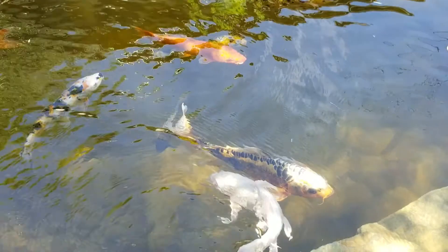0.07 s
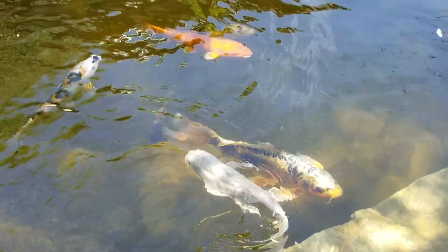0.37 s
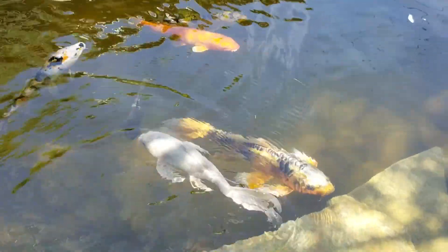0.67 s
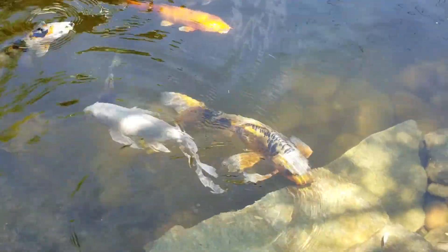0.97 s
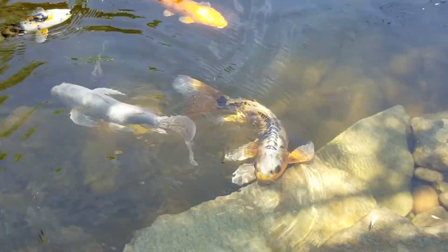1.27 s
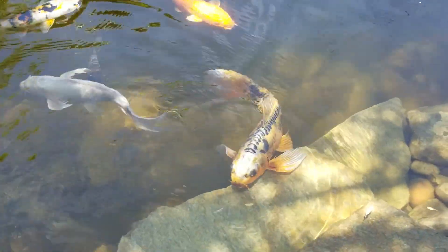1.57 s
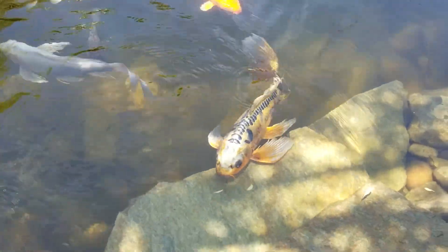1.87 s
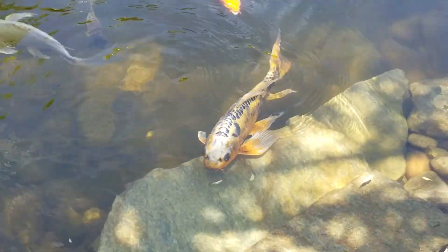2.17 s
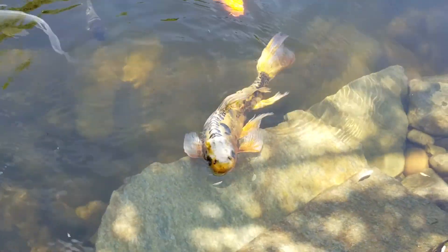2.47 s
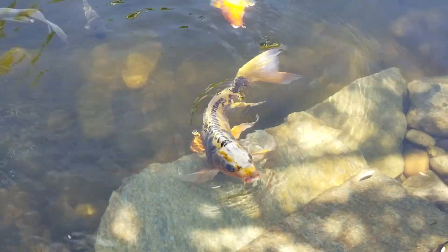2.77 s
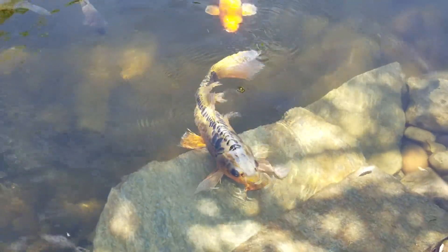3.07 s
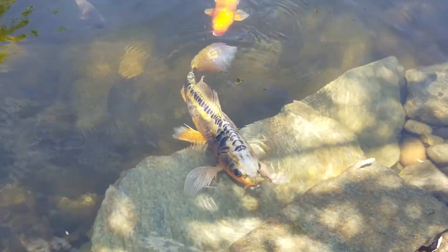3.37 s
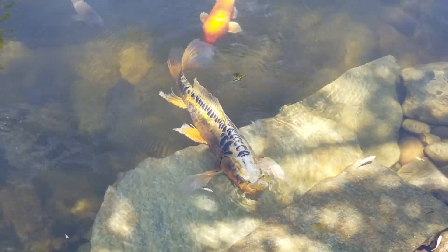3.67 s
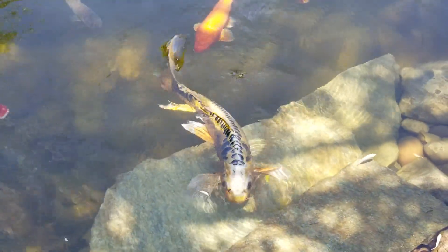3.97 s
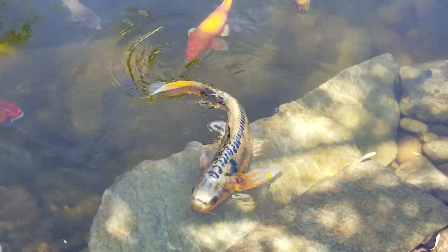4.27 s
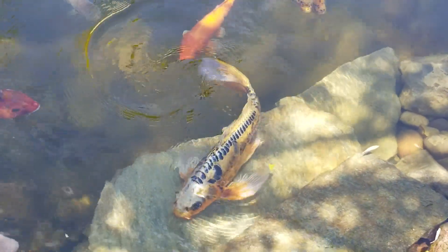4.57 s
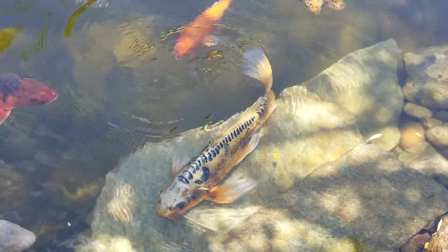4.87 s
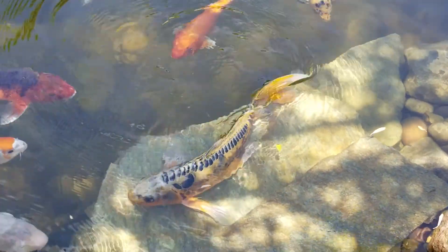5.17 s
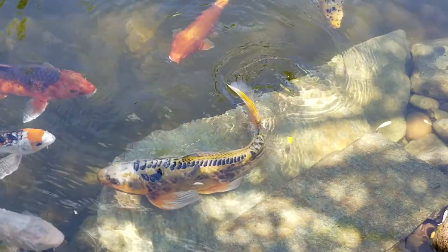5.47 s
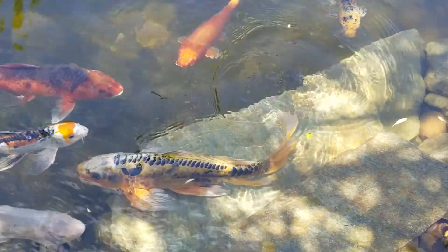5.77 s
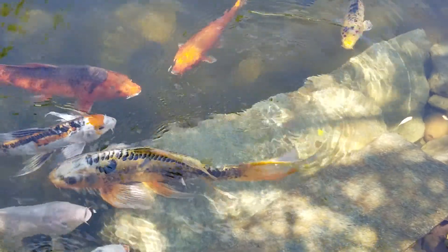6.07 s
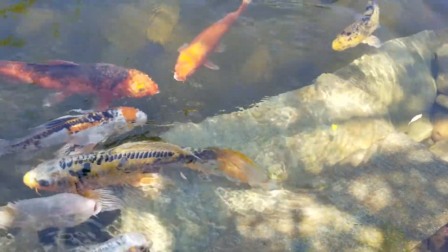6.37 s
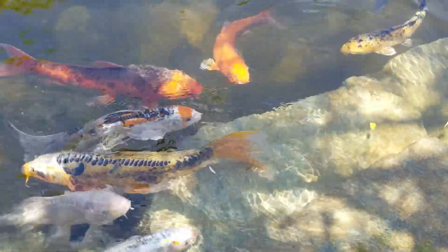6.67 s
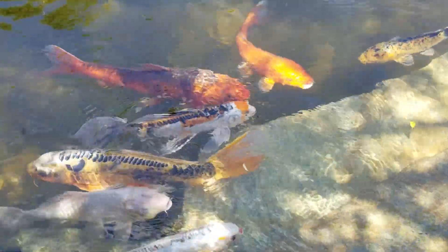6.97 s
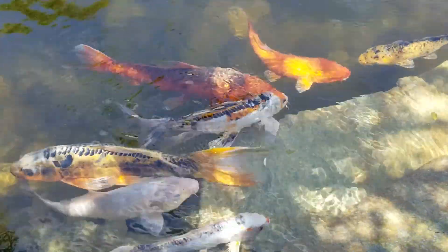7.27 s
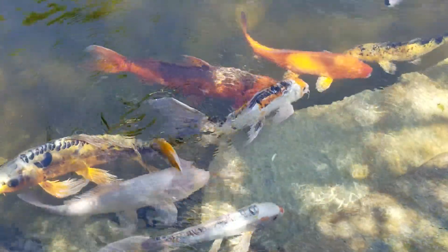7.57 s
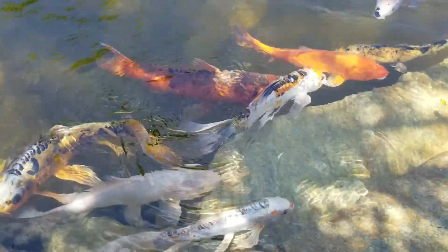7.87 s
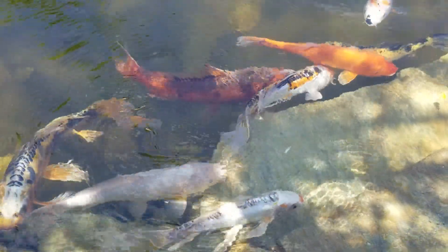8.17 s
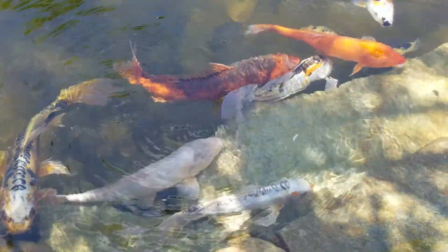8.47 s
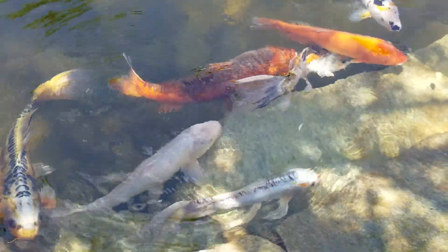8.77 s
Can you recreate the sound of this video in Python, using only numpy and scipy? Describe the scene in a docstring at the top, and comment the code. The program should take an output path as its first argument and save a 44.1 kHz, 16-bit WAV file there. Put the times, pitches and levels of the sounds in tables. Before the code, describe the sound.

A gentle pond trickle with ticking drops and small bubbles, a low motor hum behind it, and a few bumps of microphone handling.

```python
"""Water trickles into a garden pond, left of a hand-held camera: drops tick and trapped bubbles ring
over a soft wash, while a motor, probably the pump, drones low and light air rumbles.
At the start a finger rubs by the right microphone port (its opening) and knocks on the case;
it rubs again now and then. From about 5 s deeper bubbles join in, then a faint higher hum.
At 7 s the grip shifts with a rumble; the hand shields the microphone, so drone and trickle end weaker."""
import sys
import numpy as np
from scipy import signal
from scipy.fft import rfft, irfft, next_fast_len
from scipy.io import wavfile
from scipy.ndimage import uniform_filter1d, map_coordinates

SR = 44100
rng = np.random.default_rng(int(sys.argv[2]) if len(sys.argv) > 2 else 0)


def store_pcm(level_fs):
    """Save levels as 16-bit WAV."""
    pcm = np.round(np.clip(level_fs, -1, 1) * 32767).astype(np.int16)
    wavfile.write(sys.argv[1], SR, np.atleast_2d(pcm).T)


N = 388521

# In the tables, side is left minus right; likeness is 1 when both ears hear the same, 0 when unrelated.
# how fast the motor's shaft turns: t/s, f/Hz
SHAFT_SPEED = [(0, 21.8), (1.2, 20.5), (2.2, 22), (3, 20.7), (4.5, 19.6), (5.2, 19.6), (6.2, 19.0),
               (8.81, 19.6)]
# the motor's tones: multiple of the shaft speed, level/dB
MOTOR_TONES = [(4, -6.5), (6, -17), (7, -6.5), (8, -8.5), (10, -8), (11, -14.5), (14, -12), (16, -18.5)]
# its steady hum: f/Hz, level/dB
MOTOR_HUM = [(233.5, 0.5), (316, -25)]
# swells of the tone at five times the shaft speed: t/s, length/s, level/dB
MOTOR_BOOMS = [(0.588, 1.0, -49), (2.0, 0.22, -47.5), (2.504, 0.86, -48.5), (3.383, 0.81, -48.5),
               (4.336, 0.3, -43.5), (4.61, 0.48, -46.5), (5.687, 0.41, -47.5), (6.248, 0.38, -49.5)]
# soft thumps of the hand: t/s, level/dB, f/Hz, side/dB
HAND_THUMPS = [(7.2, -34, 113, 5), (7.286, -38, 78, -11), (7.417, -26.5, 102, 9), (7.467, -32, 109, 15),
               (7.656, -25, 146, -13), (7.689, -30.5, 116.2, -24), (7.77, -35, 84, -12),
               (7.816, -38, 90, -10)]
# finger strokes by the port: t/s, length/s, level/dB, fade/(dB per s)
FINGER_RUBS = [(0.0, 0.68, -62, 1), (3.043, 0.43, -58.5, 13), (3.8, 0.25, -59, 14), (5.67, 0.25, -67, 15)]
# slips of the fingertip: t/s, level/dB, side/dB
FINGER_TICKS = [(0.0907, -44, -7), (0.112, -44, 1), (0.2017, -45, -8), (0.316, -41, -5), (0.476, -46, -7),
                (0.513, -44, -8), (0.651, -44, -1), (1.6461, -50, -3), (1.6643, -42, -1),
                (2.2588, -42.5, -2), (2.6883, -42, -0.5), (3.049, -37.5, 1), (3.088, -39, -1),
                (3.1193, -48, -2), (3.157, -46, -2), (3.195, -43.5, 1), (5.6785, -44, 1),
                (5.7173, -42.5, 0), (5.7543, -44, 0), (7.8003, -45, 3), (8.225, -46, 3)]
# blows on the case: t/s, level/dB, f/Hz, side/dB, scrape relative to the blow/dB
CASE_KNOCKS = [(0.5602, -24.5, 282, -16, -23), (0.5609, -30.5, 1700, -14, -20),
               (0.5655, -23.5, 1000, -16, -15), (0.5664, -26.5, 130, -9, -16.5), (0.577, -31, 700, -10, -6),
               (0.5965, -39, 1100, -12, -14)]
# single large bubbles: t/s, level/dB, f/Hz
BIG_BUBBLES = [(3.984, -43, 980), (6.402, -40, 1290), (6.658, -50, 980), (6.895, -42.5, 1055),
               (8.232, -48.5, 1060), (8.495, -47.5, 1350)]
# droplets that burst close by: t/s, level/dB
NEAR_DROPLETS = [(1.4475, -47), (1.7613, -45), (2.0148, -43), (3.4266, -40), (4.1674, -44), (4.963, -43),
                 (6.203, -39), (6.5749, -44), (7.2703, -46)]
# small splashes: t/s, length/s, level/dB, f/Hz
SMALL_SPLASHES = [(0.734, 0.063, -49.5, 3070), (0.86, 0.045, -51, 3780), (1.15, 0.042, -54, 6800),
                  (1.782, 0.15, -52, 1690), (4.048, 0.053, -47.5, 2970), (4.735, 0.035, -50, 4200),
                  (4.901, 0.1, -53, 2600), (5.257, 0.08, -48, 3930), (5.433, 0.025, -58, 2560),
                  (5.968, 0.035, -54, 2850), (8.41, 0.04, -53, 2840), (8.683, 0.034, -50, 3480)]
# drops that only slap the surface: t/s, level/dB, f/Hz
SLAPPING_DROPS = [(0.2209, -38.5, 6760), (1.1654, -47, 5220), (1.1834, -46, 7240), (1.263, -44, 3640),
                  (1.3299, -47, 5500), (1.5314, -38, 3620), (1.6694, -42, 7290), (1.778, -44, 3680),
                  (2.2914, -41, 5620), (2.798, -40, 3640), (2.873, -37, 6900), (3.4286, -34, 7250),
                  (3.7764, -49, 4100), (4.0312, -42, 5840), (4.1679, -44, 3580), (4.3904, -36, 6910),
                  (4.4104, -35, 3970), (4.5622, -32, 7340), (5.2041, -43, 7430), (5.235, -43, 4540),
                  (5.546, -40, 4020), (5.638, -41, 3710), (6.0262, -43, 6810), (6.3175, -50, 3800),
                  (6.5206, -43, 5800), (7.0707, -40, 6300), (7.2784, -43, 3870), (7.559, -50, 3730),
                  (8.086, -47, 6170), (8.6857, -40, 4400)]
# drops that trap a ringing bubble: t/s, level/dB, f/Hz, side/dB
RINGING_DROPS = [(0.448, -38, 3900, 7), (0.611, -38.5, 4870, 7), (0.8513, -42, 2470, 9.5),
                 (0.887, -38, 3720, 6.5), (0.9907, -43, 3700, 6), (1.105, -43, 3850, 7),
                 (1.2627, -41, 3720, 8), (1.345, -45, 2430, 5), (1.719, -40, 3650, 8.5),
                 (1.7787, -38, 3700, 8.5), (1.9942, -44, 2580, 7.5), (2.014, -43, 3800, 8),
                 (2.5441, -35, 3670, 7.5), (2.6639, -44, 3880, 8), (2.902, -46, 2550, 7),
                 (3.777, -40, 2620, 8.5), (3.9907, -37.5, 3900, 11), (4.1684, -35, 3670, 6),
                 (4.371, -40, 3170, 8.5), (4.6777, -43, 6700, 9.5), (4.766, -40, 3680, 6),
                 (4.871, -42.5, 2790, 12), (5.167, -44, 4030, 8), (5.3093, -47, 2610, 8),
                 (5.4374, -41, 2620, 11), (5.4874, -46, 2770, 8), (5.6378, -41, 3780, 4),
                 (5.72, -44, 3300, 8), (6.3176, -43, 3860, 8), (6.4518, -43, 2700, 13),
                 (6.724, -39.5, 4050, 11), (6.875, -43, 4000, 8), (6.9845, -39, 3600, 4),
                 (7.278, -38, 3830, 7), (7.559, -38, 3780, 9), (7.575, -41, 2600, 8),
                 (7.9216, -40.5, 2520, 6), (7.982, -47, 4830, 5), (8.169, -50, 2520, 4),
                 (8.2116, -46, 2480, 2), (8.3948, -42.5, 4750, 0), (8.541, -46, 4100, 2.5),
                 (8.6413, -47, 2960, 8), (8.701, -40.5, 2400, 1)]

# the colour of each sound, or how strong it is from low to high: f/Hz, level/dB
BREEZE_COLOUR = [(20, -11), (45, 8.5), (80, 7.5), (105, 9), (220, -38)]
MOTOR_COLOUR = [(22, -18), (45, -9), (80, -1.5), (130, -3), (180, -6.5), (260, -7.5), (350, -16),
                (480, -19.5), (600, -26), (1200, -46)]
WHIRR_COLOUR = [(270, -36), (330, 3.5), (395, -9), (470, -0.5), (560, -23)]
GRIP_COLOUR = [(12, -46), (22, 2), (50, 2), (85, 3.5), (146, 1), (209, -23), (260, -24), (350, -39),
               (460, -70), (770, -120)]
SKIN_COLOUR = [(500, -10), (3000, -3), (4700, -0.5), (5500, -7), (6800, 2), (8500, -6), (10500, -2.5),
               (15500, -1)]
SIZZLE_COLOUR = [(9000, -40), (11600, -15), (12350, 0), (13300, -4), (14200, -12), (15500, -10)]
SCRAPE_COLOUR = [(100, 6), (350, 5), (1150, 8), (1900, 4.5), (4000, 2.5), (8500, -9), (12000, 1.5),
                 (15500, -6)]
WASH_COLOUR = [(200, -15), (360, -5), (480, -12), (620, -13.5), (800, -11), (1000, -7.5), (1450, -3.5),
               (1620, -11.5), (1850, -9), (2170, -15), (2480, -17), (4000, -14), (5500, -21), (7300, -18),
               (8900, -24.5), (9700, -22.5), (12300, -20), (15500, -20.5)]
GURGLE_COLOUR = [(550, -17.5), (760, -8.5), (930, -1.5), (1080, -3), (1400, -7), (1700, -19), (3000, -14.5)]
SPRAY_COLOUR = [(2000, -33), (4000, -13), (8700, -7), (9800, -2.5), (11000, -8), (15500, -4.5)]
FIZZ_COLOUR = [(1000, 0), (15000, 0)]
TRICKLE_COLOUR = [(700, -33), (1300, -1.5), (1620, -6), (1850, -1.5), (2280, -6.5), (2540, 2.5), (2800, 1),
                  (3150, -6), (3800, 1), (4400, -4.5), (4800, -1.5), (5250, -7.5), (5850, -3), (6250, -6.5),
                  (7100, -0.5), (7700, -7.5), (8600, -19.5), (15000, -35.5)]
# how alike a noise is in the two ears: f/Hz, likeness (above 1 counts as 1)
BREEZE_LIKENESS = [(25, 0.69), (80, 1)]
MOTOR_LIKENESS = [(25, 0.93), (70, 0.98), (300, 0.96), (700, 0.44)]
WASH_LIKENESS = [(300, 0), (640, 2.1), (1300, -0.5), (3000, 0.24), (15000, 0.15)]
# how far the wash leans to the left: f/Hz, side/dB
WASH_LEAN = [(500, 2.2), (1400, 0.77), (2500, 0.5), (4000, 0.45), (7000, 6.1), (12000, 1.9), (15000, 7.9)]

SHIELD_START_S, SHIELD_CLOSING_S = 7.58, 0.52  # the hand closes over the microphone
TIME = np.arange(N) / SR


def amp(db):
    """Turn decibels into a gain to multiply by."""
    return 10 ** (np.asarray(db) / 20)


def unit(x):
    """Scale a sound to an average strength (rms) of 1."""
    return x / np.sqrt(np.mean(x ** 2) + 1e-20)


def along(points, hz):
    """Read a table of (frequency, value) between its points, on a log scale of frequency."""
    freqs, values = np.transpose(points)
    return np.interp(np.log(hz + 1), np.log(freqs + 1), values)


def wobble(rate):
    """A smooth random curve through rate new values a second."""
    values = rng.standard_normal(int(N * rate / SR) + 4)
    return map_coordinates(values, [TIME * rate], mode="nearest")


def ramp(start, length):
    """0 before start, then rising straight to 1 over length seconds."""
    return np.clip((TIME - start) / length, 0, 1)


def held(start, hold, attack, release):
    """Fade in, stay, fade out; all in seconds, with hold counted from the start."""
    return ramp(start, attack) * (1 - ramp(start + hold, release))


def swell(centre_s, width_s, db):
    """A slow bell-shaped change of level, in dB."""
    return db * np.exp(-((TIME - centre_s) / width_s) ** 2)


def shielded(loss_db):
    """The change of level in dB as the hand closes over the microphone."""
    return -loss_db * ramp(SHIELD_START_S, SHIELD_CLOSING_S)


def pan(side_db):
    """Left and right gains that average 1; a positive side is to the left."""
    gains = amp(np.array([[.5], [-.5]]) * side_db)
    return gains / gains.mean(0)


def add(track, start, sound):
    """Mix a sound into a stereo track, start seconds in."""
    part = track[:, round(start * SR):][:, :sound.shape[-1]]
    part += sound[..., :part.shape[1]]


def filtered(x, response):
    """Multiply each frequency in a sound by response(hz)."""
    size = next_fast_len(N + SR // 4)
    return irfft(rfft(x, size) * response(np.fft.rfftfreq(size, 1 / SR)), size)[..., :N]


def band(x, low_hz, high_hz, order=4):
    """Keep the part of a sound between two frequencies."""
    return signal.sosfilt(signal.butter(order, [low_hz, high_hz], "band", fs=SR, output="sos"), x)


def coloured(x, colour, size=2048):
    """Give a stereo sound a colour while its attacks stay sharp."""
    cepstrum = irfft(np.log(amp(along(colour, np.fft.rfftfreq(size, 1 / SR)))))
    # fold the filter so that it rings only after a hit, never before
    cepstrum[1:size // 2] *= 2
    cepstrum[size // 2 + 1:] = 0
    impulse = irfft(np.exp(rfft(cepstrum)))
    return signal.oaconvolve(x, impulse[None], axes=1)[:, :N]


def rush(colour, likeness, patchy_db):
    """Stereo noise with random louder and softer patches; likeness is a table or one number."""
    def ear_mix(hz):
        alike = likeness if np.isscalar(likeness) else along(likeness, hz)
        angle = np.arccos(np.clip(alike, -1, 1)) / 2
        return np.vstack([np.cos(angle), np.sin(angle)])

    cells = signal.stft(rng.standard_normal((2, N)), nperseg=512)[2]
    patches = uniform_filter1d(rng.standard_normal(cells.shape[1:]), size=5, axis=0)
    patches = unit(uniform_filter1d(patches, size=7, axis=1))
    noise = signal.istft(cells * amp(patchy_db * patches), nperseg=512)[1][:, :N]
    mid, side = filtered(noise, lambda hz: amp(along(colour, hz)) * ear_mix(hz))
    return unit(np.array([mid + side, mid - side]))


def bubble(t, hz, cycles, rise):
    """A trapped air bubble rings for some cycles; its pitch climbs as it nears the surface."""
    age = t * hz / cycles
    climb = 1 + rise * np.minimum(age, 4) / 4
    onset = 1 - np.exp(-2 * t * hz)
    return np.sin(2 * np.pi * hz * t * climb) * np.exp(-age) * onset


def bubbles(per_s, low_hz, high_hz, cycles, spread_db, scatter_db, samples):
    """A random rain of bubbles, many faint and few loud, each from its own spot."""
    when, pitch, rarity, ring_time, side = rng.random((5, int(per_s * N / SR), 1))
    hz = low_hz * (high_hz / low_hz) ** pitch
    strength = amp(spread_db * np.minimum(-np.log(rarity), 4)) * hz / low_hz
    rings = bubble(np.arange(samples) / SR, hz, cycles * (.5 + ring_time), rise=0.073)
    rings *= strength * np.linspace(1, 0, samples)
    where = ((when * N).astype(int) + np.arange(samples)).ravel()
    gains = pan(scatter_db * (2 * side.ravel() - 1))
    return np.array([np.bincount(where, (rings * ear[:, None]).ravel(), N)[:N] for ear in gains])


def stones(x, echo_s, echo_db):
    """The stones round the pond scatter a short echo; it keeps changing as the camera moves."""
    out, t = x.copy(), np.arange(SR // 10) / SR
    envelope = amp(-60 * t / echo_s) * (1 - np.exp(-t / 0.0014))
    for part in np.array_split(np.arange(N), 30):
        tail = rng.standard_normal((2, len(t))) * envelope
        echo = signal.fftconvolve(x[:, part], tail / np.linalg.norm(tail[0]), axes=1)
        add(out, part[0] / SR, amp(echo_db) * echo)
    return out


def breeze():
    """Light air rumbles at the ports, slowly growing, with one lull and one puff."""
    lull = swell(centre_s=4.2, width_s=0.54, db=-7)
    puff = swell(centre_s=5.56, width_s=0.6, db=4)
    level_db = -64 + 1.49 * TIME + lull + puff + shielded(loss_db=10.5) + 0.23 * wobble(3.9)
    return amp(level_db) * rush(BREEZE_COLOUR, BREEZE_LIKENESS, patchy_db=1.5)


def whirr(hz=391):
    """Towards the end a faint hum sets in above the drone, with a soft rush around it."""
    tone = np.sin(2 * np.pi * hz * TIME + 0.42 * wobble(4.5))
    tone *= amp(-1 + shielded(loss_db=7))
    halo = rush(WHIRR_COLOUR, likeness=0.8, patchy_db=-4)
    halo *= amp(-5.5 + shielded(loss_db=-3))  # the rush grows as the tone weakens
    return amp(-64) * ramp(start=6.6, length=0.33) * (tone + halo)


def motor(boom_edge_s=0.07):
    """A turning shaft drones: wavering tones and a hum in a dull roar; one tone booms now and then."""
    shaft_hz = np.interp(TIME, *np.transpose(SHAFT_SPEED))
    angle = 2 * np.pi * np.cumsum(shaft_hz) / SR
    tones = sum(amp(db + 3.76 * wobble(6)) * np.sin(multiple * angle + 0.67 * wobble(5))
                for multiple, db in MOTOR_TONES)
    hum = sum(amp(db + 1.7 * wobble(2.93)) * np.sin(2 * np.pi * hz * TIME + 0.5 * wobble(3.7))
              for hz, db in MOTOR_HUM)
    roar = rush(MOTOR_COLOUR, MOTOR_LIKENESS, patchy_db=1.5)
    drone = tones + amp(-2.5) * hum + amp(1.5) * roar
    drone_db = -53.5 + swell(centre_s=3.94, width_s=0.95, db=2.3) + 0.093 * wobble(3.85)
    booming = sum(amp(db) * held(start - boom_edge_s / 2, length, boom_edge_s, boom_edge_s)
                  for start, length, db in MOTOR_BOOMS)
    boom = booming * amp(2.4 * wobble(7)) * np.sin(5 * angle + 1.25 * wobble(6))
    return pan(1) * (boom + amp(drone_db + shielded(loss_db=15)) * drone)


def grip():
    """The hand shifts on the case: a rumble that swells and fades, with a few soft thumps."""
    pressure = held(start=7.04, hold=0.74, attack=0.14, release=0.3)
    rumble = rush(GRIP_COLOUR, likeness=0.1, patchy_db=-1.7)
    out = pressure * amp(-44.5 + 0.46 * wobble(12)) * pan(-2.4) * rumble
    t = np.arange(-SR // 40, SR // 40) / SR
    for centre, db, hz, side_db in HAND_THUMPS:
        thump = np.sin(2 * np.pi * hz * t) * np.exp(-(t * hz / 0.58) ** 2)
        add(out, centre + t[0], amp(db) * pan(side_db) * thump)
    return out


def finger(catch_s=0.0081):
    """Skin slides by the right port: a thin hiss fades along each stroke, and each slip ticks."""
    strokes = sum(held(start, length, catch_s, catch_s) * amp(db - fade * length * ramp(start, length))
                  for start, length, db, fade in FINGER_RUBS)
    hiss = strokes * rush(SKIN_COLOUR, likeness=0.52, patchy_db=1)
    # the narrow gap between finger and port sizzles until the finger first lets go
    touching = 1 - ramp(start=0.58, length=0.09)
    sizzle = amp(-64.5) * touching * rush(SIZZLE_COLOUR, likeness=0.47, patchy_db=1)
    ticks, t = np.zeros((2, N)), np.arange(SR // 40) / SR
    snap = 0.7 * np.exp(-t / 0.0012) + 0.5 * np.exp(-t / 0.006)
    for start, db, side_db in FINGER_TICKS:
        add(ticks, start, amp(db) * pan(side_db) * rng.standard_normal((2, len(t))) * snap)
    roughness = amp(2.2 * wobble(200))
    return pan(-5.5) * roughness * (hiss + sizzle) + coloured(ticks, SKIN_COLOUR)


def knock():
    """A finger bumps the case: each contact clicks, pushes air in and out of the port and scrapes."""
    pushes, scrapes, t = np.zeros((2, N)), np.zeros((2, N)), np.arange(SR // 10) / SR
    for start, db, hz, side_db, scrape_db in CASE_KNOCKS:
        push = -np.sin(2 * np.pi * hz * t) * np.exp(-(t * hz / 1.2) ** 2)
        click = -min(hz / 900, 1) * np.exp(-t / 0.00019)  # harder contacts click more
        scrape = rng.standard_normal((2, len(t))) * np.exp(-t / 0.013)
        add(pushes, start, amp(db) * pan(side_db) * (amp(-5) * push + amp(2) * click))
        add(scrapes, start, amp(db + scrape_db) * pan(-12) * scrape)
    return pushes + coloured(scrapes, SCRAPE_COLOUR)


def wash(flutter_above_hz=8000):
    """Water farther off blurs into a soft wash whose treble flutters with fine spatter."""
    far = rush(WASH_COLOUR, WASH_LIKENESS, patchy_db=1.5)
    far = filtered(far, lambda hz: pan(along(WASH_LEAN, hz)))
    treble = filtered(far, lambda hz: 1 - 1 / (1 + (hz / flutter_above_hz) ** 10))
    flutter = amp(0.9 * unit(wobble(7) + wobble(30) + wobble(120)))
    level_db = -58 + shielded(loss_db=0.9) + 0.4 * wobble(13)
    return amp(level_db) * (far + (flutter - 1) * treble)


def gurgle():
    """Large bubbles burble where the stream plunges in; a surge brings deeper ones, and a few glug."""
    crowd = bubbles(per_s=700, low_hz=643, high_hz=1717, cycles=2.95,
                    spread_db=2.1, scatter_db=13, samples=700)
    crowd = unit(coloured(stones(crowd, echo_s=0.13, echo_db=-0.5), GURGLE_COLOUR))
    burble_db = -61.5 + swell(centre_s=7.04, width_s=0.54, db=2.7) + 0.3 * wobble(3.4)
    burble = amp(burble_db + shielded(loss_db=5)) * pan(3.8) * crowd
    deep = bubbles(per_s=260, low_hz=500, high_hz=790, cycles=4, spread_db=2, scatter_db=9, samples=1100)
    surge = amp(-70) * held(start=5.15, hold=2.46, attack=0.18, release=0.18) * unit(deep)
    glugs, t = np.zeros((2, N)), np.arange(SR // 20) / SR
    for start, db, hz in BIG_BUBBLES:
        add(glugs, start, amp(db) * pan(3.3) * bubble(t, hz, cycles=3.5, rise=0.036))
    return burble + surge + stones(glugs, echo_s=0.085, echo_db=5.5)


def spray():
    """Tiny droplets land and burst: dry, very high ticks, a few of them close by."""
    ticks = bubbles(per_s=130, low_hz=9800, high_hz=15500, cycles=0.9,
                    spread_db=2.2, scatter_db=1, samples=96)
    ticks = unit(coloured(stones(ticks, echo_s=0.022, echo_db=1), SPRAY_COLOUR))
    near, t = np.zeros((2, N)), np.arange(SR // 50) / SR
    for start, db in NEAR_DROPLETS:
        add(near, start, amp(db) * rng.standard_normal((2, len(t))) * np.exp(-t / 0.0041))
    return amp(-70.5 + 0.88 * wobble(6.6)) * pan(1.8) * ticks + pan(6.3) * coloured(near, SPRAY_COLOUR)


def drip():
    """A thin thread of water keeps trapping bubbles of one size, so they ring near one pitch."""
    rings = bubbles(per_s=51, low_hz=2425, high_hz=2730, cycles=11,
                    spread_db=3, scatter_db=-2, samples=900)
    return amp(-78 + shielded(loss_db=15)) * pan(6) * unit(stones(rings, echo_s=0.075, echo_db=-4))


def splashes(bubbles_each=22):
    """A small splash sheds a run of bubbles of like size, their pitch drifting upward."""
    out, t = np.zeros((2, N)), np.arange(SR // 40) / SR
    for start, length, db, hz in SMALL_SPLASHES:
        for when, pitch, softness in rng.random((bubbles_each, 3)):
            ring_hz = hz * np.exp(0.22 * (pitch - .5) + 0.039 * (when - .5))
            ring = bubble(t, ring_hz, cycles=3.1, rise=0.047)
            add(out, start + when * length, amp(db - 10 * softness) * pan(4.3) * ring)
    return stones(out, echo_s=0.063, echo_db=6.5)


def slaps():
    """A drop that traps no bubble gives a short, noisy tick, strongest around one frequency."""
    out, t = np.zeros((2, N)), np.arange(SR // 40) / SR
    for start, db, hz in SLAPPING_DROPS:
        burst = rng.standard_normal(len(t)) * np.exp(-t / 0.0036)
        broad = band(burst, 2600, 7900)
        bright = band(burst, hz * 0.96, hz * 1.004, order=2)
        add(out, start, amp(db - 5) * pan(11) * (broad + 2 * bright))
    return stones(out, echo_s=0.12, echo_db=-1)


def drops():
    """A drop ticks on the surface, then the bubble it traps rings briefly."""
    out, t = np.zeros((2, N)), np.arange(SR // 25) / SR
    for start, db, hz, side_db in RINGING_DROPS:
        tick = band(rng.standard_normal(len(t)) * np.exp(-t / 0.0025), 2000, 7500)
        ring = bubble(t, hz, cycles=8.5, rise=0.039)
        add(out, start, amp(db) * pan(side_db) * (amp(-11) * tick + amp(-4.5) * ring))
    return stones(out, echo_s=0.09, echo_db=-3.5)


def trickle():
    """The near stream: many small bubbles and sharp spatter over a fine fizz, in quick spurts."""
    rings = bubbles(per_s=1600, low_hz=1387, high_hz=8010, cycles=5,
                    spread_db=2, scatter_db=10, samples=512)
    spatter = bubbles(per_s=600, low_hz=2910, high_hz=12000, cycles=0.92,
                      spread_db=3.6, scatter_db=5, samples=96)
    patter = stones(unit(rings) + amp(-2.5) * unit(spatter), echo_s=0.054, echo_db=-2.5)
    fizz = rush(FIZZ_COLOUR, likeness=0.27, patchy_db=1)
    water = unit(patter) + amp(-4) * fizz
    # the camera swings round, and the trickle's colour moves up a little in pitch
    swung = ramp(start=1.1, length=0.44)
    before = coloured(water, [(hz * 0.94, db) for hz, db in TRICKLE_COLOUR])
    after = coloured(water, TRICKLE_COLOUR)
    stream = unit((1 - swung) * before + swung * after)
    spurts_db = 0.55 * wobble(6.5) + 1.2 * wobble(45)
    return amp(-59 + spurts_db + shielded(loss_db=8.5)) * pan(11.7) * stream


def scene():
    """Air and motor, the hand on the camera and the pond together."""
    background = breeze() + whirr() + motor()
    handling = grip() + finger() + knock()
    water = wash() + gurgle() + spray() + drip() + splashes() + slaps() + drops() + trickle()
    return background + handling + water


def record(dry):
    """The camera sheds the lowest rumble and cuts off the very highest treble."""
    low_hz, top_hz = 15, 15850
    return filtered(dry, lambda hz: (hz < top_hz) * 1j * hz / (1j * hz + low_hz))


dry = scene()
out = record(dry)
store_pcm(out)
```